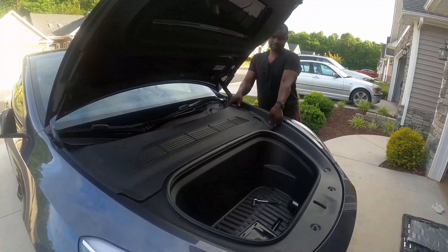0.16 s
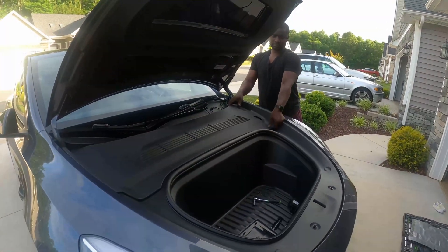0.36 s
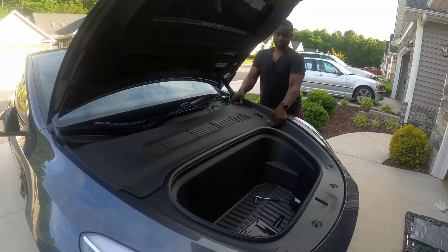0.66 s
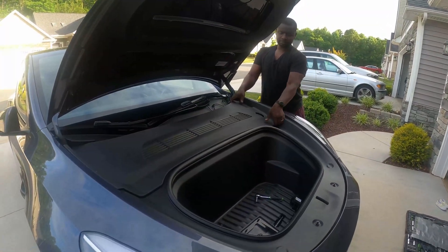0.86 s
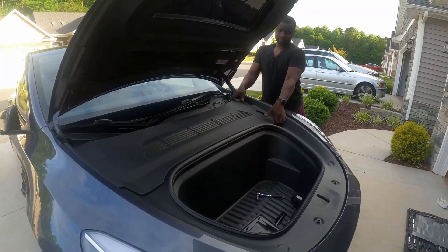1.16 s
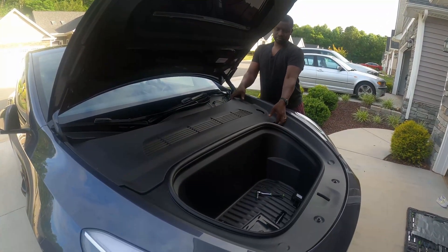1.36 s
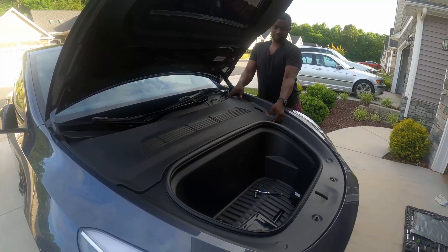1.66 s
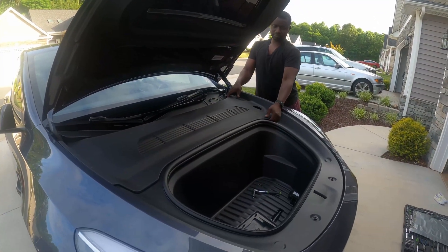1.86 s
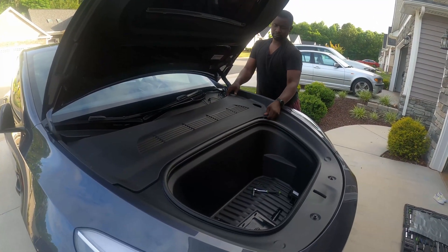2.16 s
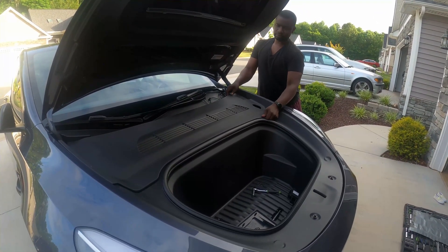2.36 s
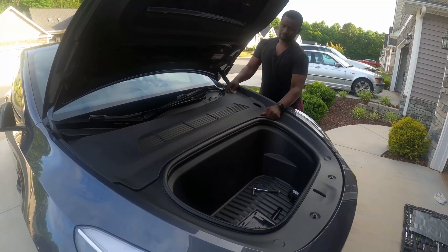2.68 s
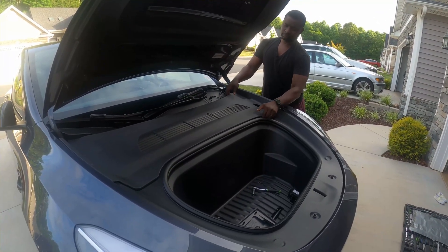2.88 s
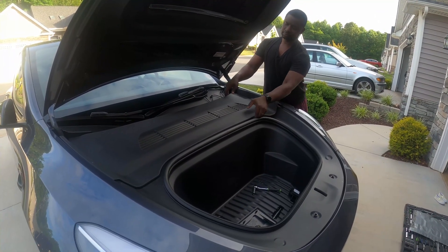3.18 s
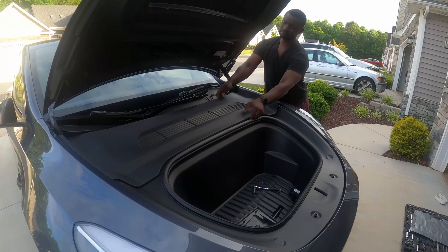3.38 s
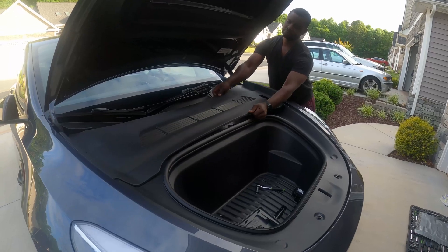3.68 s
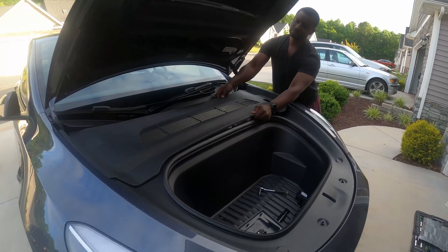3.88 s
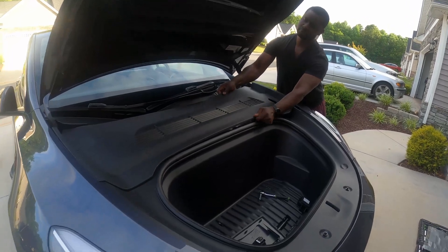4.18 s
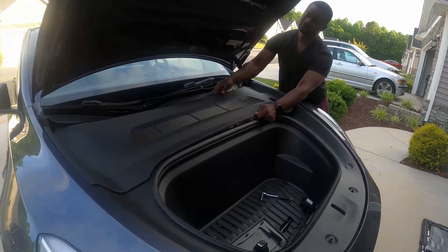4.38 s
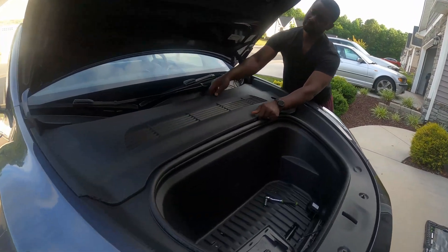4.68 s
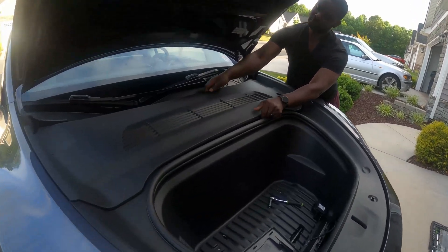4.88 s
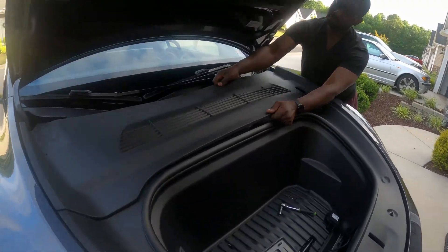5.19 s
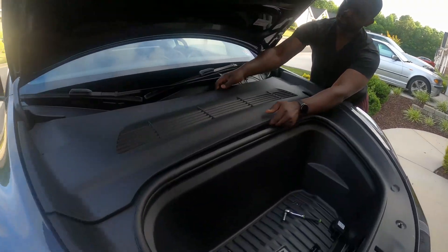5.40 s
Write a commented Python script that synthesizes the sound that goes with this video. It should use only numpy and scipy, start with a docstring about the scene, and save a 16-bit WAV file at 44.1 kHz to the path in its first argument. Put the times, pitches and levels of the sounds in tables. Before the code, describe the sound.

A low, fuzzy outdoor hum with soft rumble opens almost alone, with only faint ticks. From about 1.5 seconds a plastic car trim panel pops loose in clusters of sharp clicks, hollow knocks and low thumps, each followed by a short rattle. The heaviest cluster comes near 3.8 seconds, then frequent drier cracks and knocks run to the end. Close microphone on a driveway, nearly mono at first, then wide.

```python
"""First comes a low outdoor hum with rumble; soon hands pull a plastic trim panel off a car in a driveway.
Each snap is a burst of noise with a tick, plus panel notes for knock and thump; a lumpy rattle follows.
Single fading notes make hollow knocks and pings, and uneven slips make a short creak.
Shaped noise makes the rubbing, the outdoor air and hum (both grow near the end) and the low rumble.
The sound opens from nearly mono to wide, and a gain control turns it down after loud moments."""
import sys
import numpy as np
from scipy import signal
from scipy.fft import rfft, irfft, next_fast_len
from scipy.io import wavfile
from scipy.ndimage import uniform_filter1d

SR = 44100
rng = np.random.default_rng(int(sys.argv[2]) if len(sys.argv) > 2 else 0)


def output_pcm(signal):
    """Save a mono or channel-first signal as 16-bit PCM at the path in sys.argv[1].

    Samples are clipped to [-1, 1] before scaling.
    """
    pcm = np.clip(np.atleast_2d(signal).T, -1, 1) * 32767
    wavfile.write(sys.argv[1], SR, np.round(pcm).astype(np.int16))


N = 244314  # length in samples

# The main snaps, their follow-up knocks and rattles; levels apply before the mix weights in snap():
# (t/s, tick level/dB, tick f/Hz, knock level/dB, knock centre f/Hz, thump level/dB, thump centre f/Hz,
# brightness tilt/dB per octave (roughly), rattle level/dB against the crack)
CLIP_SNAPS = [(0.35, -61, 2980, -37.5, 1060, -48, 178, 7, -9),
              (0.44, -46, 2970, -36.5, 1040, -35.5, 175, 5, -10),
              (1.058, -36.5, 2970, -46, 1270, -55, 161, -4.5, -12.5),
              (1.312, -53, 5150, -48, 1066, -21.5, 151, 5.5, 1.5),
              (1.351, -43.5, 2220, -34.5, 1030, -46, 97.7, 0, -12.5),
              (1.554, -28.5, 2080, -15, 674, -23, 157, 3, -22),
              (1.853, -27, 3300, -11, 1030, -18.5, 295, 1.5, -10.5),
              (1.863, -29, 3560, -23.5, 867, -10, 214, -1, 1.5),
              (1.895, -25.5, 2520, -25, 760, -6.5, 195.5, -10, -15),
              (1.909, -25.5, 1900, -16.5, 1135, -7.5, 138.4, -3.5, -33.5),
              (1.916, -34.5, 3800, -22, 1500, -11, 202, -4.5, -25),
              (2.347, -22, 2010, -21, 660, -14, 159, -10, -14),
              (2.403, -47, 4840, -51.5, 690, -45, 200, -3, -19),
              (2.45, -30.5, 4400, -19.5, 790, -43.5, 180, -6.5, -22),
              (2.492, -47.5, 4800, -43.5, 695, -45, 220, 2, -13.5),
              (2.538, -54.5, 8350, -47.5, 1340, -50, 188, 9, 2),
              (2.564, -20, 2070, -11.5, 585, -34.5, 190, -1.5, -3.5),
              (2.6, -30.5, 2250, -20.5, 700, -8, 105.4, 6, -15.5),
              (2.628, -36, 3900, -33.5, 1070, -28, 200, -4.5, -5),
              (2.952, -40, 2760, -31, 715, -23, 190.5, 0.5, -15.5),
              (2.98, -47, 4200, -47.5, 1500, -39, 190, 6, -17),
              (3.006, -34, 2340, -39, 1060, -25, 208, -4.5, -3),
              (3.025, -47, 3240, -37, 1178, -31.5, 220, -19, -24.5),
              (3.082, -39.5, 3000, -30.5, 1090, -43.5, 119, -0.5, -8),
              (3.093, -26.5, 3750, -42, 1000, -38.5, 121, -8.5, -33.5),
              (3.203, -52, 3600, -31, 960, -40.5, 160, 2, -16),
              (3.716, -54, 5900, -47.5, 1720, -20, 129, 6, 0),
              (3.756, -22, 3430, -19.5, 620, -13.5, 131, -8.5, 2),
              (3.762, -18, 3500, -15.5, 1120, -1.5, 138.3, 2, -9),
              (3.8, -11, 4930, -19.5, 675, -9.5, 129.5, -3, -15.5),
              (3.81, -21, 2750, -14, 440, -1.5, 131, -1, -8.5),
              (3.828, -26, 2190, -30.5, 744, -8, 90.5, -4, 2.5),
              (3.926, -18.5, 4200, -41, 1070, -21, 122.4, -5, -16.5),
              (3.939, -45, 2270, -18.5, 663, -39.5, 215, 8, -23.5),
              (3.982, -33.5, 4550, -36.5, 660, -44.5, 152, -19.5, -7.5),
              (4.003, -44.5, 3300, -58.5, 1050, -43.5, 100, -1.5, -2.5),
              (4.1, -21.5, 4250, -23, 1570, -42.5, 100, 1.5, -18.5),
              (4.11, -25.5, 2860, -24, 1370, -38.5, 98, -10, -10.5),
              (4.165, -36.5, 4200, -53, 1560, -38.5, 106, 0.5, -13),
              (4.306, -43, 3600, -47.5, 1500, -43, 145, -5, -25),
              (4.33, -35, 2700, -41, 1450, -20.5, 150, -6, -24.5),
              (4.486, -20, 3730, -19, 1440, -26.5, 160, 1.5, -11),
              (4.494, -21, 3200, -23.5, 1360, -16.5, 160.5, -3, -12),
              (4.531, -51, 3840, -22.5, 525, -23, 127, 3, -25),
              (4.576, -39.5, 3530, -39.5, 533, -31, 136.5, -11.5, -5.5),
              (4.666, -41, 2100, -32.5, 700, -13.5, 142.4, 4, -8.5),
              (4.672, -27, 3950, -30, 1520, -23.5, 138, -19, -7.5),
              (4.693, -41, 3220, -45, 1000, -36.5, 140, -7.5, -11.5),
              (4.723, -43, 2600, -36.5, 790, -38.5, 108, -1, -25.5),
              (4.804, -46, 2590, -25.5, 1260, -16, 116.4, 7, -23),
              (4.825, -30, 2580, -42, 1030, -25, 223, -5.5, -21.5),
              (4.927, -17.5, 3000, -28, 1580, -46, 101.4, -15, -24),
              (4.959, -42, 4220, -33, 550, -26.5, 141, 1, -5.5),
              (4.989, -41.5, 2870, -34.5, 510, -14, 148.6, 0, -10),
              (5.136, -12.5, 2600, -20, 1430, -13, 164, -2, -16.5),
              (5.155, -26, 5370, -13, 1400, -15.5, 260, 1, -17.5),
              (5.197, -36, 2400, -37, 1510, -36, 150, -7, -7.5),
              (5.242, -24, 4160, -27, 1160, -20, 101, -2.5, -18.5),
              (5.282, -31, 4060, -56, 1020, -22.5, 159, -3, -15.5),
              (5.377, -13.5, 3300, -19, 1990, -37.5, 158, 3.5, -11),
              (5.41, -23, 2640, -18.5, 538, -21, 194, -4.5, -14),
              (5.431, -30.5, 3460, -28, 1500, -17, 157, 0, -12),
              (5.445, -30.5, 2340, -28.5, 594, -13, 219, -5.5, -7.5),
              (5.522, -22, 3720, -37, 1930, -30, 118.4, -6, -23.5),
              (5.536, -27.5, 3580, -37.5, 430, -41, 132, -3.5, -10)]


def snaps():
    """Clips snap free and the panel knocks and rattles on; all these blows share the panel's notes."""
    mix, modes = np.zeros((2, N)), panel_modes()
    for start_s, *settings in CLIP_SNAPS:
        add(mix, start_s, snap(modes, *settings))
    return mix


# Tone of the crack and rattle before the tilt, only the shape matters: (f/Hz, level/dB)
CRACK_TONE = [(880, -19), (1500, -9), (1820, -9.5), (2010, -10), (3120, -10.5), (3610, -9), (4140, -13.5),
              (5040, -15), (6890, -24.5), (8250, -25.5), (8750, -17), (9350, -28.5), (10800, -32.5),
              (12300, -33.5), (15500, -64)]
RISE_S, CRACK_T60_S, RATTLE_T60_S = 0.0015, 0.034, 0.36  # t60: time to fall by 60 dB
RATTLE_TREBLE_T60_S = 0.35  # an extra fade on the bright part of the rattle
CHATTER_PER_S, CHATTER_DB, CHATTER_T60_S = 500, -9, 0.008  # tiny clicks inside each rattle
PAN_SPREAD_DB = 3  # typical chance level difference between left and right
PING_DB = -13  # level of the pings inside the rattle


def snap(modes, tick_db, tick_hz, knock_db, knock_hz, thump_db, thump_hz, tilt_db, rattle_db):
    """A short crack followed by a duller, lumpy rattle drives tick and knock; a low panel thump joins in."""
    t = np.arange(modes.shape[1]) / SR
    noise = rng.standard_normal((6, len(t)))
    pan_db = PAN_SPREAD_DB * rng.standard_normal()

    # the loose edge chatters on its seat
    lumps = gain_of(0.78 * evened(uniform_filter1d(noise[4], size=160)))
    clicks = (rng.random(len(t)) < CHATTER_PER_S / SR) * np.minimum(abs(noise[5]), 1.5)
    chatter = signal.oaconvolve(clicks, gain_of(-60 * t / CHATTER_T60_S))[:len(t)]
    lumps = lumps * (1 + gain_of(CHATTER_DB) * chatter)
    rattle = gain_of(rattle_db - 60 * t / RATTLE_T60_S) * lumps * np.minimum(t / 0.0037, 1)
    attack = np.minimum(t / RISE_S, 1)
    crack = gain_of(-60 * t / CRACK_T60_S) * attack

    def tone(hz):
        return gain_of(read(CRACK_TONE, hz) + tilt_db * np.log2(hz / 3000 + 0.19))

    def dull_tone(hz):
        return tone(hz) / (1 + (hz / 8000) ** 4)

    def tongue_tone(hz):
        return 1 / (1 + ((hz - tick_hz) / (0.091 * tick_hz)) ** 2)

    shared = noise[0]
    own = colour(noise[1], lambda hz: gain_of(read(SIDE_LEVEL, hz) - 1.5))
    pair = np.array([shared + own, shared - own])
    bright = evened(colour(pair, tone))
    dull = evened(colour(pair, dull_tone))

    tongue = evened(colour(pair, tongue_tone))
    tongue_ring = np.sin(2 * np.pi * tick_hz * t) * gain_of(-60 * t / 0.035) * attack
    grit = gain_of(1.7 * evened(uniform_filter1d(noise[3], size=30)))  # the crack is a cluster of tiny slips
    tick = 0.087 * tongue_ring
    tick = tick + (0.36 * bright * grit + 0.19 * tongue) * crack
    tick += (0.28 * dull + 0.068 * tongue) * rattle
    rattle_treble = 0.18 * bright * gain_of(-60 * t / RATTLE_TREBLE_T60_S)
    ping_sound = gain_of(PING_DB) * pings(t, np.sqrt(tick_hz * knock_hz))
    tick += (rattle_treble + ping_sound) * rattle

    # the blow rings the panel, then noise keeps stirring the same notes
    body = ring(modes[:, :4000], knock_hz, 0.61)
    drive = noise[2] + 0.11 * noise[3] * [[1], [-1]]
    stirred = evened(colour(drive, lambda hz: rfft(body, len(t))))
    knock = stirred * (0.37 * crack + 0.81 * rattle)
    knock[:, :4000] += body * attack[:4000]

    thump = ring(modes, thump_hz, 0.16) * np.minimum(t / 0.003, 1)
    sides = gain_of(np.array([[pan_db], [-pan_db]]) / 2)  # only the tick is placed left or right
    sound = gain_of(tick_db) * tick * sides + gain_of(knock_db) * knock + gain_of(thump_db) * thump
    return sound * np.minimum((t[-1] - t) / 0.09, 1)  # fade out the last 90 ms


# The panel's own notes (modes); levels count against each other: (f/Hz, level/dB, t60/s)
PANEL_MODES = [(69.4, -5.5, 0.64), (105.9, -11, 0.26), (129.5, 3, 0.1), (167.3, -3.5, 0.34),
               (212.8, 5, 0.12), (286, 14.5, 0.098), (338.7, 6, 0.24), (403, 4.5, 0.043), (479, 1.5, 0.061),
               (586, 4, 0.031), (698, 1.5, 0.027), (774, -0.5, 0.03), (905, 2.5, 0.026), (1046, 6, 0.016),
               (1282, -14, 0.2), (1346, -13.5, 0.029), (1480, -6.5, 0.055), (1520, -3.5, 0.01),
               (1830, -1.5, 0.012), (2020, -27, 0.024)]


def panel_modes():
    """One row for each mode of the panel: a sine that fades after a blow."""
    t = np.arange(2 ** 13) / SR
    hz, db, t60 = np.transpose(PANEL_MODES)[:, :, None]
    return gain_of(db - 60 * t / t60) * np.sin(2 * np.pi * hz * t)


def ring(modes, centre_hz, spread):
    """The struck panel: modes near the centre pitch are excited most; the peak is scaled to 1."""
    distance = abs(np.log(np.transpose(PANEL_MODES)[0] / centre_hz))
    sound = np.exp(-distance / spread) @ modes
    return sound / abs(sound).max()


# PING_TURNS: turns to fall by 60 dB; PING_OCTAVES: furthest from the centre pitch
PINGS, PING_TURNS, PING_OCTAVES = 36, 16, 0.9


def pings(t, centre_hz):
    """Short bounces of the loose edge: brief notes at chance moments and pitches around the centre."""
    when, pitch = rng.random(PINGS), rng.uniform(-1, 1, PINGS)
    size = rng.uniform(0.27, 1, PINGS)
    hz, out = centre_hz * 2 ** (PING_OCTAVES * pitch), np.zeros((1, len(t)))
    turns = hz[:, None] * t[:500]
    envelope = size[:, None] * np.minimum(turns, 1) * gain_of(-60 * turns / PING_TURNS)
    notes = envelope * np.sin(2 * np.pi * turns)
    for start_s, note in zip(when * t[-1], notes):
        add(out, start_s, note[None])
    return evened(out[0])


# Hollow knocks and pings, a small patch of the panel or a clip ringing one note:
# (t/s, level/dB, f/Hz, t60/s)
HOLLOW_NOTES = [(1.555, -30, 696, 0.078), (1.854, -8, 1100, 0.015), (1.854, -21, 1610, 0.014),
                (1.856, -30, 3630, 0.029), (1.857, -8.5, 321, 0.098), (1.863, -24, 974, 0.077),
                (1.878, -7, 247, 0.049), (1.909, -23.5, 1140, 0.041), (1.915, -20.5, 1470, 0.023),
                (2.347, -21.5, 706, 0.067), (2.346, -19.5, 1130, 0.016), (2.346, -26, 1650, 0.02),
                (2.357, -3.5, 225, 0.015), (2.448, -40.5, 3480, 0.05), (2.451, -41.5, 3800, 0.039),
                (2.45, -34, 1130, 0.047), (2.567, -2.5, 610, 0.014), (2.5681, 2, 199, 0.064),
                (2.566, -15.5, 1030, 0.028), (2.583, -17, 187, 0.11), (2.604, -23, 690, 0.043),
                (2.606, -23.5, 1520, 0.039), (2.619, -10, 211, 0.091), (2.633, -22, 199, 0.21),
                (2.952, -45, 2670, 0.021), (3.006, -56, 2370, 0.064), (3.008, -36, 4800, .015),
                (3.008, -46, 3300, .03), (3.082, -38, 3000, .03), (3.203, -45.5, 3570, .03),
                (3.756, -21.5, 1093, 0.067), (3.757, -18.5, 615, 0.043), (3.801, -7, 784, 0.023),
                (3.802, -16, 540, 0.033), (3.804, -20, 3630, .03), (3.811, -19, 930, 0.031),
                (3.926, -24, 3830, 0.032), (3.926, -36, 4520, 0.06), (3.937, -24.5, 1470, 0.033),
                (4.1004, -22, 1580, 0.022), (4.101, -32, 3140, .02), (4.102, -28, 4900, 0.017),
                (4.103, -34.5, 8600, 0.015), (4.108, -23, 1430, 0.048), (4.481, -28.5, 1500, 0.032),
                (4.487, -24, 2900, 0.018), (4.487, -29, 6040, 0.011), (4.491, -26, 1394, 0.028),
                (4.492, -16.5, 152, 0.19), (4.507, -30.5, 2800, 0.059), (5.135, -26, 3900, .015),
                (5.138, -16, 2640, .025), (5.141, -19.5, 1380, 0.026), (5.153, -15, 1340, 0.017),
                (5.245, -30.5, 4110, 0.023), (5.284, -39, 3960, .02), (5.283, -35, 2250, .02),
                (5.378, -12, 3660, 0.016), (5.379, -20, 2080, .02), (5.4, -22, 2480, 0.021),
                (5.414, -3, 201, 0.037), (5.433, -24, 1420, 0.037), (5.449, -14, 228, 0.046),
                (5.453, -30, 1490, 0.025), (5.521, -25, 3760, 0.017)]
HOLLOW_RISE_TURNS = 1


def hollows():
    """Each hollow knock is one sine that swells over one turn while it dies away."""
    mix, t = np.zeros((2, N)), np.arange(SR // 5) / SR
    for start_s, db, hz, t60 in HOLLOW_NOTES:
        envelope = gain_of(db - 60 * t / t60) * np.minimum(t * hz / HOLLOW_RISE_TURNS, 1)
        note = envelope * np.sin(2 * np.pi * hz * t)
        add(mix, start_s, np.array([note, note]))
    return mix


# A short creak as the edge drags: (t/s, length/s, level/dB, first f/Hz, last f/Hz, slips per s (about))
EDGE_CREAKS = [(3.098, .07, -41, 1200, 950, 140)]


def creaks():
    """The edge drags along its seat and creaks at the listed times."""
    mix = np.zeros((2, N))
    for start_s, *settings in EDGE_CREAKS:
        add(mix, start_s, creak(*settings))
    return mix


CREAK_WIDTH_HZ, CREAK_UNEVEN_DB = 140, 4  # width of the resonance; unevenness of slip rate and strength


def creak(length, db, first_hz, last_hz, per_s):
    """Uneven slips ring a resonance whose pitch glides from first to last."""
    t = np.arange(round(length * SR)) / SR
    luck = rng.standard_normal((3, SR // 5))[:, :len(t)]
    rate = per_s * gain_of(CREAK_UNEVEN_DB * evened(uniform_filter1d(luck[0], size=300)))
    slip_count = np.floor(np.cumsum(rate) / SR)
    slips = (np.diff(slip_count, prepend=0) > 0) * gain_of(CREAK_UNEVEN_DB * luck[1])
    slips = slips + 0.064 * luck[2]  # a little noise under the slips
    # undo the glide, ring at a standstill, then put the glide back
    turn = np.exp(2j * np.pi * np.cumsum(np.linspace(first_hz, last_hz, len(t))) / SR)
    decay = np.exp(-np.pi * CREAK_WIDTH_HZ / SR)
    note = evened((turn * signal.lfilter([1], [1, -decay], slips / turn)).real)
    return gain_of(db) * note * np.sin(np.pi * t / length) ** 0.5 * np.ones((2, 1))


# Tone of the rubbing, only the shape matters: (f/Hz, level/dB)
RUB_TONE = [(350, -26), (600, 9), (866, -15.5), (979, 1), (1320, -6.5), (1640, -8.5), (1810, -11.5),
            (2830, -11.5), (8750, -32.5), (12600, -47.5), (15500, -63.5)]
# How hard the panel rubs on its seat: (t/s, level/dB)
RUB_LEVEL = [(0, -60.5), (1.1, -61), (1.4, -57), (2.55, -56.5), (2.8, -56), (3.06, -55), (3.12, -54.5),
             (3.17, -52.5), (3.22, -52), (3.8, -55.5), (4.3, -59), (4.55, -52.5), (5.54, -47.5)]


def rubbing():
    """The panel rubs along its seat: patchy noise follows the rubbing level."""
    return level_over_time(RUB_LEVEL) * hiss(lambda hz: gain_of(read(RUB_TONE, hz)), 256, 1.2, 1.2)


# Airy treble of the rubbing: (t/s, level/dB)
AIRY_LEVEL = [(0, -81), (2.9, -84), (3.2, -76), (3.55, -71.5), (3.7, -83), (4.2, -78), (4.7, -92),
              (4.95, -65.5), (5.2, -73), (5.54, -62)]
AIRY_HZ, AIRY_OCTAVES = 6400, 0.99  # centre and width of its band


def airy_rubbing():
    """The rubbing also makes a breathy treble: noise in one smooth hump of frequencies."""
    def hump(hz):
        return np.exp(-(np.log2((hz + 1) / AIRY_HZ) / AIRY_OCTAVES) ** 2)
    return level_over_time(AIRY_LEVEL) * hiss(hump, 256, 1.5, 1.5)


# Tone of the outdoor air, only the shape matters: (f/Hz, level/dB)
AIR_TONE = [(150, -43), (250, 0), (285, -6), (393, -10), (609, -14), (661, -16), (740, -16.5), (944, -16.5),
            (1180, -15.5), (1410, -22), (1800, -19.5), (2380, -31), (2930, -31), (12000, -101),
            (15600, -107), (22000, -120)]
AIR_DB, AIR_SWELL = -46, 7.2  # starting level; growth in dB per s


def air():
    """Outdoor air: soft noise that grows late on."""
    return late_swell(AIR_DB, AIR_SWELL) * hiss(lambda hz: gain_of(read(AIR_TONE, hz)), 1024, 0.6, 0.3)


# Fuzzy bands of the hum; levels count against each other: (f/Hz, width/Hz, level/dB)
HUM_BANDS = [(152.9, 19.2, 3.5), (215.6, 29.2, 0.5), (291.6, 26, -16)]
HUM_DB, HUM_SWELL = -32, 4.9  # starting level; growth in dB per s


def hum():
    """Outdoor hum: noise squeezed into narrow bands, so it is pitched but fuzzy; it grows late on."""
    def bands(hz):
        return sum(gain_of(db) / (1 + (2 * (hz - f) / width) ** 2) for f, width, db in HUM_BANDS)
    return late_swell(HUM_DB, HUM_SWELL) * hiss(bands, 4096, 0.6, 0.4)


# Tone of the rumble, only the shape matters: (f/Hz, level/dB)
RUMBLE_TONE = [(8.8, -35.5), (15, -22.5), (54, 0.5), (96, 0), (118, -1), (130, -4), (170, -23), (290, -120)]
# Level of the rumble over time: (t/s, level/dB)
RUMBLE_LEVEL = [(0, -35), (0.26, -40.5), (1.14, -40.5), (1.9, -35), (2.5, -31.5), (2.93, -38.5),
                (3.19, -33.5), (4.3, -36.5), (4.9, -32), (5.54, -28)]


def rumble():
    """Low rumble: very low noise that swells after the knocks and near the end."""
    return level_over_time(RUMBLE_LEVEL) * hiss(lambda hz: gain_of(read(RUMBLE_TONE, hz)), 4096, 0.8, 0.6)


def level_over_time(points):
    """Gain for every sample from a table of times and decibels."""
    return gain_of(np.interp(np.arange(N) / SR, *np.transpose(points)))


SWELL_FROM_S = 4.52


def late_swell(start_db, db_per_s):
    """A gain that holds still, then grows from the swell time on."""
    late = np.maximum(np.arange(N) / SR - SWELL_FROM_S, 0)
    return gain_of(start_db + db_per_s * late)


def hiss(shape, size, patchy_db, flicker_db):
    """Stereo noise with drifting patches and a flicker shared by all frequencies."""
    frames, hz = 4 * N // size + 5, np.fft.rfftfreq(size, 1 / SR)
    a, b, c, d, patches = rng.standard_normal((frames, len(hz), 5)).T
    patches = uniform_filter1d(uniform_filter1d(patches, size=8, axis=0), size=10, axis=1)
    flicker = evened(uniform_filter1d(rng.standard_normal(frames), size=3))
    wander = gain_of(patchy_db * evened(patches) + flicker_db * flicker)
    spectra = np.array([a + 1j * b, c + 1j * d]) * shape(hz)[:, None] * wander
    pair = signal.istft(spectra, nperseg=size, noverlap=3 * size // 4)[1][:, :N]
    return widen(evened(pair))


# How loud the unshared (side) sound is against the shared (mid) sound: (f/Hz, level/dB)
SIDE_LEVEL = [(25, -9), (60, -15), (125, -31.5), (300, -34), (1000, -17), (3000, -7.5), (8000, -3.5),
              (14000, 5.5)]


def widen(pair):
    """Left and right from a shared and an unshared sound; the unshared part grows at both ends of the range."""
    side = colour(pair[1], lambda hz: gain_of(read(SIDE_LEVEL, hz)))
    return np.array([pair[0] + side, pair[0] - side])


def gain_of(db):
    """Decibels to gain."""
    return 10 ** (np.asarray(db) / 20)


def evened(x):
    """Scales to an average (rms) strength of 1."""
    return x / np.sqrt(np.mean(x ** 2) + 1e-20)


def read(points, hz):
    """Reads a table along a log-frequency axis."""
    f, value = np.transpose(points)
    return np.interp(np.log(hz + 1), np.log(f + 1), value)


def add(mix, start_s, sound):
    """Mixes a sound in at its start time, cut off where the mix ends."""
    part = mix[:, round(start_s * SR):][:, :sound.shape[1]]
    part += sound[:, :part.shape[1]]


def colour(x, shape):
    """Filters by a gain given as a function of frequency."""
    size = next_fast_len(x.shape[-1], True)
    return irfft(rfft(x, size) * shape(np.fft.rfftfreq(size, 1 / SR)), size)[..., :x.shape[-1]]


def opening(start, length, shut_db, open_db):
    """A gain that climbs steadily from shut to open."""
    return np.interp(np.arange(N) / SR, [start, start + length], gain_of([shut_db, open_db]))


# GAIN_SHARE: part of the excess taken away; SENSED_FALL: how fast the remembered loudness sinks, dB per s
GAIN_KNEE_DB, GAIN_SHARE, GAIN_SENSE_S, SENSED_FALL = -22.5, 0.3, 0.1, 6


def ducked(x):
    """Gain control: turns down after loud moments and recovers slowly."""
    t = np.arange(round(5 * GAIN_SENSE_S * SR)) / SR
    memory = np.exp(-t / GAIN_SENSE_S)
    power = signal.oaconvolve((x ** 2).mean(0), memory / memory.sum())[:N]
    power_db = 10 * np.log10(abs(power) + 1e-12)
    fall = np.arange(N) * SENSED_FALL / SR
    sensed_db = np.maximum.accumulate(power_db + fall) - fall
    over_db = np.maximum(sensed_db - GAIN_KNEE_DB, 0)
    return x / gain_of(GAIN_SHARE * over_db)


def scene():
    """Snaps, creak and hollow knocks over the rubbing and the outdoor background."""
    struck = snaps() + creaks() + hollows()
    return struck + rubbing() + airy_rubbing() + air() + hum() + rumble()


# How far the left port leads the right: (f/Hz, lead/radians)
PORT_LEAD = [(150, 0.033), (3200, -0.53), (7300, -1), (11000, -0.93)]
# The housing shades the left port, changing its tone: (f/Hz, level/dB)
LEFT_SHADE = [(1500, 0.4), (4000, 1), (8000, -.5), (13000, -1.5)]
# The stereo image opens: (start/s, opening time/s, side level before/dB, side level after/dB)
OPEN_TREBLE, OPEN_BASS = (2, 3, -49.5, -1.5), (4, 0.05, -42.5, 8)
EDGE_HZ = 15550  # nothing much passes above this


def record(dry):
    """Two close microphone ports hear slightly out of step; the image widens; gain control; band limit."""
    left = colour(dry[0], lambda hz: gain_of(read(LEFT_SHADE, hz)) * np.exp(1j * read(PORT_LEAD, hz)))
    mid, side = (left + dry[1]) / 2, (left - dry[1]) / 2
    bass = colour(side, lambda hz: 1 / (1 + (hz / 250) ** 4))
    side = opening(*OPEN_TREBLE) * (side - bass) + opening(*OPEN_BASS) * bass
    # the top treble of the shared sound is softened
    mid = colour(mid, lambda hz: 1 / np.sqrt(1 + (hz / 9640) ** 8))
    both = ducked(np.array([mid + side, mid - side]))
    low_pass = signal.firwin(1023, EDGE_HZ, window=("kaiser", 11), fs=SR)
    return signal.oaconvolve(both, low_pass[None], "same")


dry = scene()
out = record(dry)
output_pcm(out)
```